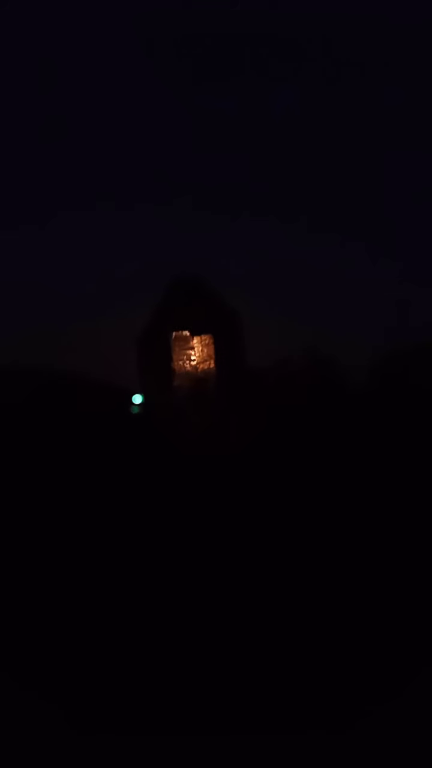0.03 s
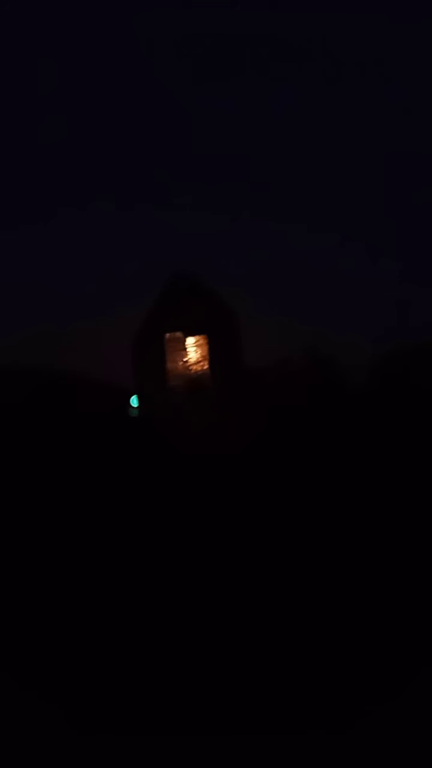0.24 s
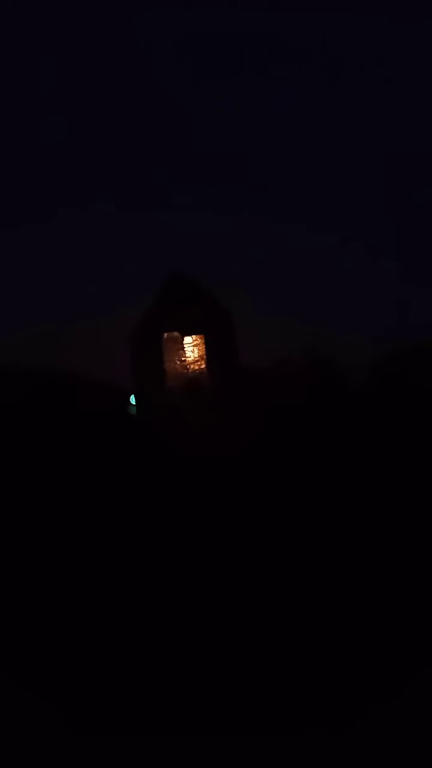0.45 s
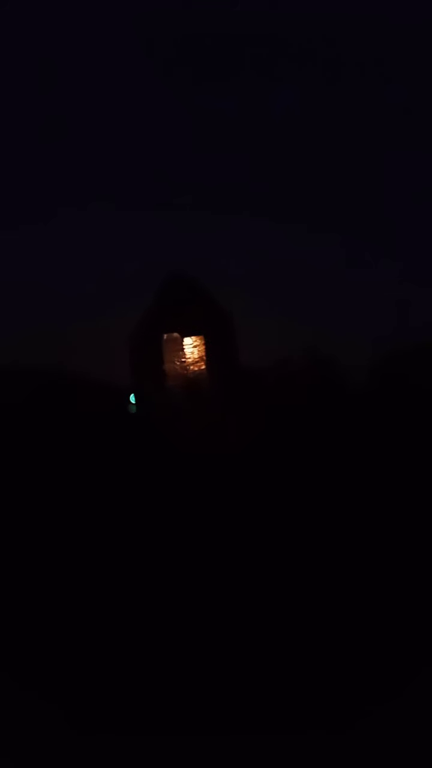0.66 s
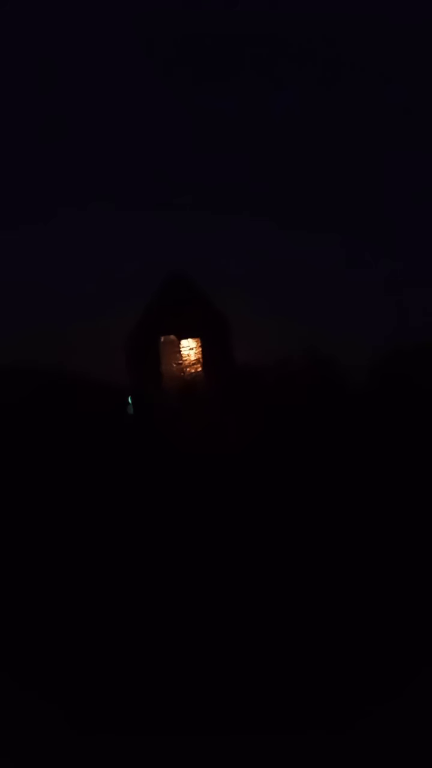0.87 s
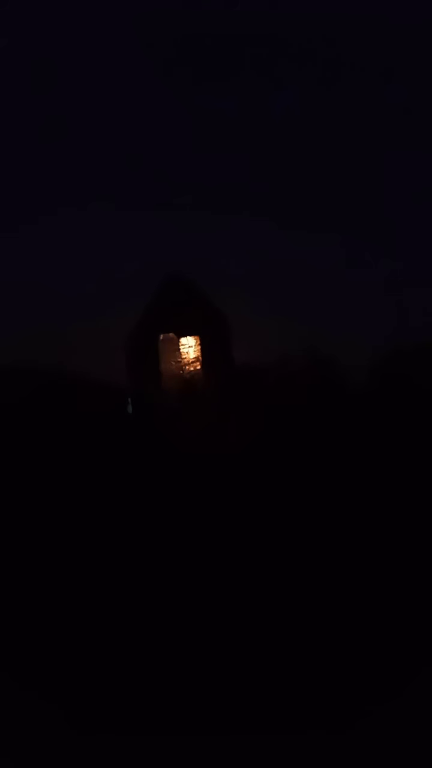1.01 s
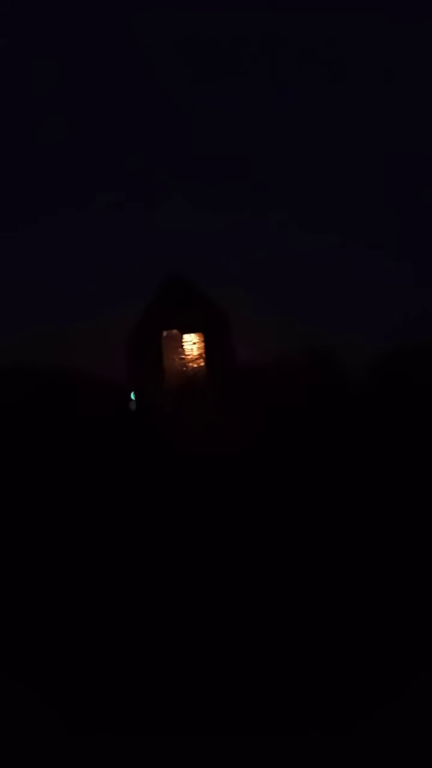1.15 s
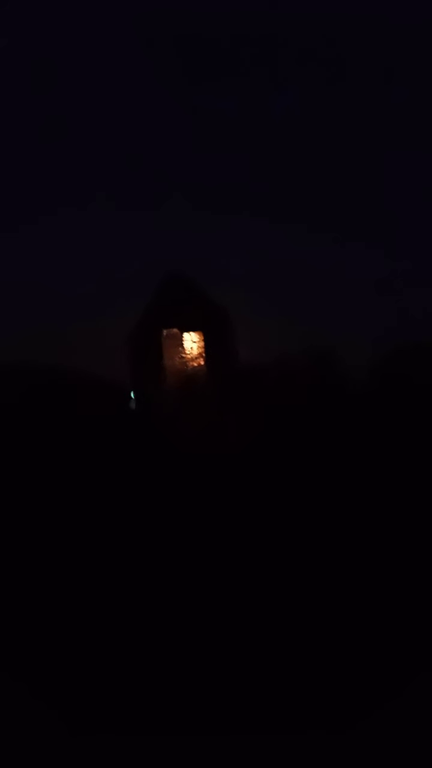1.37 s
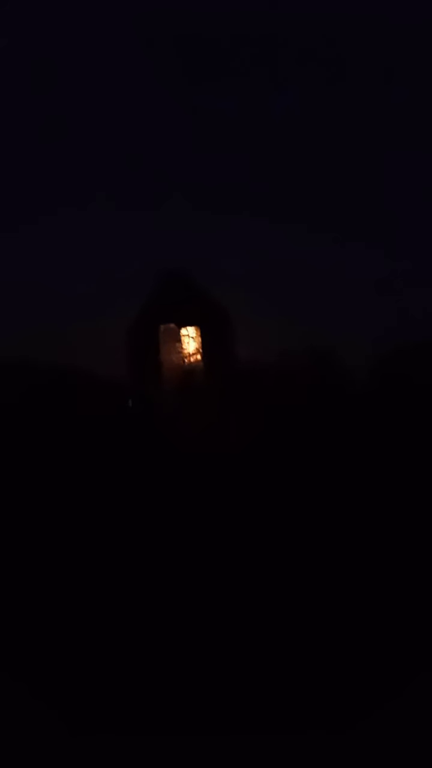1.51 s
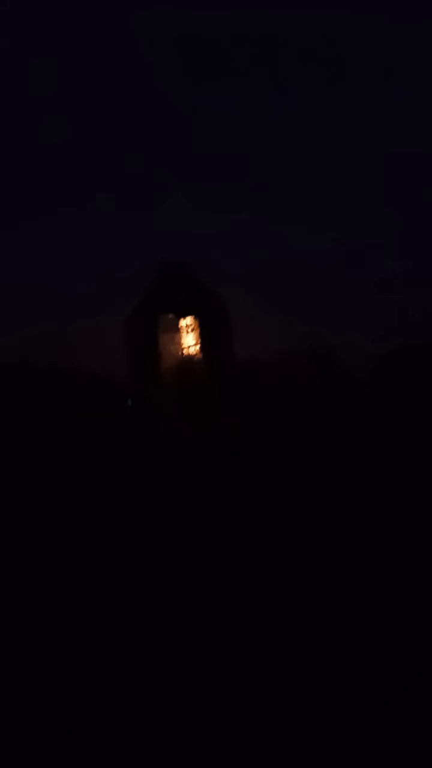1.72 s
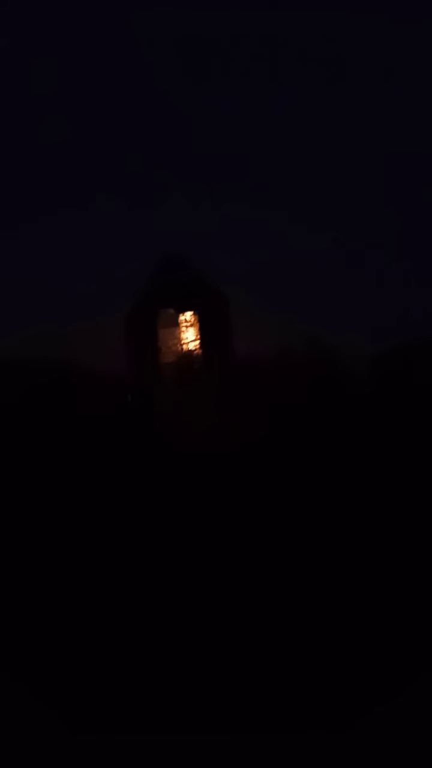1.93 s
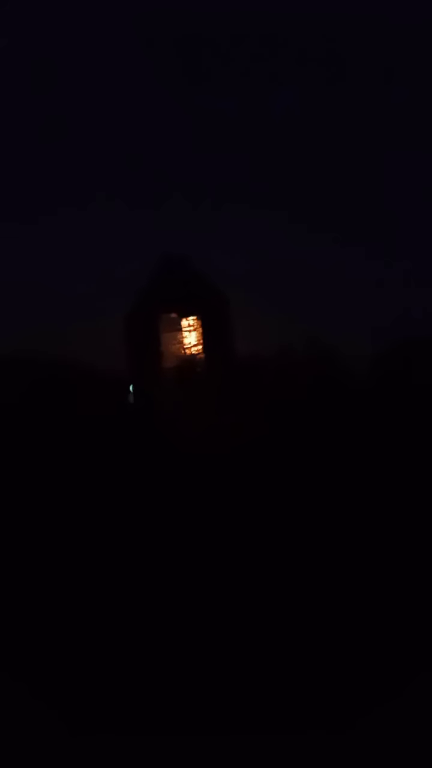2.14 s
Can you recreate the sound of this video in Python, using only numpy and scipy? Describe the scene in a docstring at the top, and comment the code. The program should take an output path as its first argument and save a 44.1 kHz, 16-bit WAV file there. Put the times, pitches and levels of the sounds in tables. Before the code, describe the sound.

Crickets sing without pause in a quiet night field. A loud, close insect buzz cuts off at the start; short even trills, faint distant rasps and thin ticks follow over still air and a barely audible low drone.

```python
"""A steady chorus of crickets and other insects, near and far, in a grassy field at night.
Each singer is a straying tone pulsed once per wing stroke; shaped noise stands for the countless far ones.
Very close to the microphone one insect ends its buzz at the start: gliding tones over grainy noise.
A nearer cricket trills in bouts of even strokes; three thin ticks are short bursts of bright noise.
Distant rasps of banded noise come and go over still air, a faint knock and a low drone of tones and rumble."""
import sys
import numpy as np
from scipy import signal
from scipy.fft import rfft, irfft, next_fast_len
from scipy.io import wavfile

SR = 44100
rng = np.random.default_rng(int(sys.argv[2]) if len(sys.argv) > 2 else 0)


def persist_wave(psi):
    """Save psi, clipped to +-1, as 16-bit WAV."""
    counts = np.round(np.clip(psi, -1, 1) * 32767).astype(np.int16)
    wavfile.write(sys.argv[1], SR, np.atleast_2d(counts).T)


N = 96314

# Groups that sing throughout:
# pitch_hz [Hz], spread_hz [Hz either side], level_db [dB], strokes_per_s [1/s], roughness [0-1]
CHOIRS = [(2600, 70, -51, 76, 0.01), (3235, 110, -52.5, 58, 0.11), (5464, 210, -42, 84, 0.07),
          (6988, 120, -39.5, 84, 0.1)]
# Gain of the highest group over time: time_s [s], gain_db [dB]
TOP_GAIN = [(0.09, 11), (.125, -15), (.165, 6), (.23, 0), (.78, 0.5), (1.1, 0.5), (1.47, 0.5), (1.62, 2),
            (1.97, -3.5), (2.055, 6.5), (2.18, -6)]
# Bouts of the nearer cricket:
# start_s [s], length_s [s], level_db [dB relative to TRILL_DB], strokes_per_s [1/s]
TRILLS = [(.187, .155, -4.5, 60), (.53, .19, -8, 62), (.82, .135, -6.5, 64), (1.03, .18, -9.5, 64),
          (1.43, .155, -4.5, 59), (1.847, .166, -.8, 63.5), (2.035, .125, -4, 68)]
# Strokes of the very close insect:
# start_s [s], length_s [s], level_db [dB], first_hz [Hz], last_hz [Hz]
CLOSE_STROKES = [(.004, .008, -20, 6700, 6700), (.012, .016, -24, 6900, 6950),
                 (.028, .015, -18, 7030, 6900), (.043, .015, -17.5, 6900, 6200),
                 (.070, .012, -18.5, 6880, 6450), (.082, .011, -19.5, 6660, 6560)]
# Spectrum of its wing scrape: freq_hz [Hz], density_db [relative dB per Hz]
SCRAPE_COLOUR = [(1500, -70), (3400, -28), (4100, -9.5), (4800, -9.5), (5500, 6.5), (6050, 4.5),
                 (6950, 5.5), (7700, -6), (9500, -17), (13800, -17)]
# Level of its wing scrape over time: time_s [s], level_db [dB]
SCRAPE_LEVEL = [(0, -15.5), (.01, -23), (.05, -24), (.066, -24.5), (.088, -35), (.102, -55)]
# Thin high ticks: start_s [s], level_db [dB]
TICKS = [(.964, -42), (1.022, -42), (1.081, -42)]
# Spectrum of a tick: freq_hz [Hz], density_db [relative dB per Hz]
TICK_COLOUR = [(5500, -33), (7200, 2), (8000, 1.5), (8600, -13), (9600, -12), (13500, -28)]
# Distant rasping calls, before their edges are widened:
# start_s [s], length_s [s], upper_db [dB], lower_db [dB]
RASPS = [(0.07, 0.11, -50, -55), (0.232, 0.088, -44.5, -52.5), (0.332, 0.085, -42.5, -55),
         (0.437, 0.092, -42.5, -55.5), (0.562, 0.083, -48, -56), (0.638, 0.097, -45.5, -58),
         (0.752, 0.13, -46.5, -55), (1.231, 0.22, -46, -57), (1.445, 0.23, -44.5, -57.5),
         (1.677, 0.26, -47, -57.5)]
# Spectra of the two rasp bands: freq_hz [Hz], density_db [relative dB per Hz]
RASP_UPPER = [(2000, -56), (3400, -45), (3850, -4.5), (4300, 3.5), (4800, 6.5), (5300, 1), (6000, -62),
              (8000, -43)]
RASP_LOWER = [(900, -61), (1450, -44), (1720, -19), (1870, -0.5), (2030, -5), (2200, -14), (2500, -41),
              (4000, -74)]
# Spectrum of countless far insects: freq_hz [Hz], density_db [relative dB per Hz]
WASH_COLOUR = [(1500, -42), (2250, -28.5), (2480, -8), (2900, -12), (3400, -11.5), (3650, -19.5),
               (3850, -16.5), (4900, -8.5), (5300, -1.5), (5900, -0.5), (6450, -7), (7000, -0.5),
               (7450, -5.5), (7900, -15.5), (8350, -26), (10700, -26), (11500, -34.5), (13800, -27)]
# Spectrum of the night air: freq_hz [Hz], density_db [relative dB per Hz]
AIR_COLOUR = [(20, -19), (70, -12), (200, -2), (280, -9.5), (350, -16.5), (560, -26), (900, -21.5),
              (1030, -11), (1150, -22), (1280, -12.5), (1500, -17), (2200, -1), (4000, -47)]
# Spectrum of the uneven low rumble: freq_hz [Hz], density_db [relative dB per Hz]
RUMBLE_COLOUR = [(20, -17), (40, -22), (70, -1), (150, -4.5), (800, -50)]
# Lasting tones of the low drone: pitch_hz [Hz], level_db [dB]
DRONE = [(164, -72.5), (244, -74)]
# Swells of the low drone: start_s [s], length_s [s], pitch_hz [Hz, centre], level_db [dB]
SWELLS = [(0.17, 0.048, 238, -59), (0.361, .22, 245, -65.5), (0.368, 0.22, 164, -60.5),
          (0.667, 0.052, 240, -61), (0.882, 0.21, 247.7, -62.5), (.99, 0.06, 161.2, -61),
          (1.085, 0.12, 243, -58.5), (1.302, .13, 239.7, -60), (1.352, .14, 166, -60.5),
          (1.545, 0.064, 82, -60.5), (1.706, 0.067, 246, -64.5), (1.744, 0.22, 164, -60.5),
          (1.79, 0.21, 82, -64.5), (1.976, .13, 247.7, -62.5)]
# Modes of the faint knock: pitch_hz [Hz], level_db [dB], t60_s [s]
KNOCK_MODES = [(470, -56.5, 0.11), (790, -62, 0.15)]

# Wings: rate of the roughness, share by which pitch strays (rms) and how fast
RASP_HZ, WANDER, WANDER_HZ = 245, .012, 71.4
# Chorus: singers per group, pulse exponent, share by which pitch sags in a stroke
SINGERS, STROKE_SHARP, SAG = 3, 0.86, 0.04
# Each singer's slow pitch drift and level swell (rms), and the rate of both
PITCH_DRIFT_HZ, WAVER_DB, WAVER_HZ = 35, 2.5, 6
TRILL_HZ, TRILL_DB = 5536, -33
TRILL_SAG, TRILL_ROUGH, TRILL_SHARP = 0.017, .05, 2.7  # share, 0-1, pulse exponent
CLOSE_ROUGH, CLOSE_WANDER, CLOSE_EDGE_S = .04, .005, .0025  # 0-1, share (rms), seconds
TICK_S, RASP_EDGE_S = .034, 0.037
WASH_DB, AIR_DB = -36.5, -61
DRONE_WIDTH_HZ, KNOCK_S = 7, .088
ECHO_DB, ECHO_T60_S = -4.5, 0.12
EDGE_HZ = 14000


def chorus():
    """All the groups of singers; the highest swells and falls back."""
    *lower, top = [choir(*row) for row in CHOIRS]
    top_gain = amp(np.interp(clock(), *np.transpose(TOP_GAIN)))
    return sum(lower) + top * top_gain


def choir(hz, spread, db, rate, rough, rate_spread=.14, unsteady=0.0836):
    """A few singers of one kind, each with its own pitch and unsteady wing pace."""
    out = np.zeros(N)
    for place in np.linspace(-1, 1, SINGERS):
        pace = rate * (1 + rate_spread * rng.uniform(-1, 1) + unsteady * drift(12.36))
        turns = np.cumsum(pace) / SR + rng.random()
        pitch = hz + spread * place + PITCH_DRIFT_HZ * drift(WAVER_HZ)
        swell = amp(WAVER_DB * drift(WAVER_HZ))
        out += unit(song(turns, pitch, SAG, rough, STROKE_SHARP, WANDER) * swell)
    return amp(db) * unit(out)


def song(turns, hz, sag, rough, sharp, wander):
    """One swelling pulse per wing stroke, its pitch sagging as the wing closes."""
    phase = turns % 1
    pulse = abs(np.sin(np.pi * phase)) ** sharp
    pitch = hz * (1 + sag * (.5 - phase))
    return unit(pulse * wing(pitch, rough, wander))


def wing(hz, rough, wander):
    """A wing rung by the teeth of its file: a straying tone, roughened by uneven strikes."""
    rough = np.clip(rough, 0, 1)
    ring = np.sqrt(1 - rough) + np.sqrt(rough) * flutter(RASP_HZ)
    pitch = hz * (1 + wander * drift(WANDER_HZ))
    tone = np.exp(2j * np.pi * np.cumsum(pitch) / SR)
    return unit((ring * tone).real)


def close_insect(grain_db=-2.0):
    """Gliding wing strokes right at the microphone, over a grainy scrape that soon dies away."""
    t = clock()
    strokes = np.zeros(N)
    for start, length, db, first, last in CLOSE_STROKES:
        glide = np.interp(t, [start, start + length], [first, last])
        tone = wing(glide, CLOSE_ROUGH, CLOSE_WANDER)
        strokes += amp(db) * gate(start, length, CLOSE_EDGE_S) * tone
    level = amp(np.interp(t, *np.transpose(SCRAPE_LEVEL)))
    level = level * (t < SCRAPE_LEVEL[-1][0])
    scrape = unit(noise(SCRAPE_COLOUR) * amp(grain_db * drift(RASP_HZ)))
    return strokes + level * scrape


def near_cricket(edge_s=0.0096):
    """A nearer cricket: short bouts of fast, even wing strokes."""
    out = np.zeros(N)
    for start, length, db, rate in TRILLS:
        turns = (clock() - start) * rate
        trill = song(turns, TRILL_HZ, TRILL_SAG, TRILL_ROUGH, TRILL_SHARP, WANDER)
        out += amp(db) * gate(start, length, edge_s) * trill
    return amp(TRILL_DB) * out


def ticks(edge_s=0.0075, grain_db=1.0):
    """Three brief, bright and uneven wing scrapes."""
    scrape = unit(noise(TICK_COLOUR) * amp(grain_db * drift(RASP_HZ)))
    level = sum(amp(db) * gate(start, TICK_S, edge_s) for start, db in TICKS)
    return scrape * level


def rasps(grain_db=1.5, throb_db=3.0):
    """Grainy calls in two bands, blurred by distance; the lower band throbs."""
    upper = unit(noise(RASP_UPPER) * amp(grain_db * drift(90)))
    lower = unit(noise(RASP_LOWER) * amp(throb_db * drift(27)))
    out = np.zeros(N)
    for start, length, upper_db, lower_db in RASPS:
        # widened to leave room for the soft edges
        envelope = gate(start - RASP_EDGE_S / 4, length + RASP_EDGE_S / 2, RASP_EDGE_S)
        out += envelope * (amp(upper_db) * upper + amp(lower_db) * lower)
    return out


def knock(rise_s=0.0037, tail_db=-8, tail_t60_s=0.32, blur_hz=35):
    """A soft, hollow knock: decaying modes that scatter into a broken tail."""
    t = np.maximum(clock() - KNOCK_S, 0)
    rings = np.zeros(N)
    for hz, db, t60 in KNOCK_MODES:
        ring = amp(-60 * t / t60) * np.sin(2 * np.pi * hz * t)
        tail = amp(tail_db - 60 * t / tail_t60_s) * hum(hz, blur_hz)
        rings += amp(db) * (ring + tail)
    return np.minimum(t / rise_s, 1) * rings


def far_insects_and_air(shimmer_db=1.0):
    """Shimmering noise of insects too far to tell apart, and steady noise of still air."""
    wash = unit(noise(WASH_COLOUR) * amp(shimmer_db * drift(200)))
    return amp(WASH_DB) * wash + amp(AIR_DB) * noise(AIR_COLOUR)


def drone(rumble_db=-71.5, gust_db=2.0):
    """Weak low tones over an uneven rumble; now one tone, now another swells out."""
    rumble = amp(rumble_db) * unit(noise(RUMBLE_COLOUR) * amp(gust_db * drift(8.8)))
    tones = sum(amp(db) * hum(hz, DRONE_WIDTH_HZ) for hz, db in DRONE)
    swells = np.zeros(N)
    for start, length, hz, db in SWELLS:
        pitch = hz + DRONE_WIDTH_HZ * drift(16)
        tone = unit(np.sin(2 * np.pi * np.cumsum(pitch) / SR))
        swells += amp(db) * gate(start, length, length / 2) * tone
    return rumble + tones + swells


def field(x):
    """Short, weak scatter from ground and bushes: decaying noise convolved with the sound."""
    t = clock()[:SR // 2]
    tail = rng.standard_normal(len(t)) * np.exp(-np.log(1000) * t / ECHO_T60_S)
    scatter = signal.fftconvolve(x, tail / np.linalg.norm(tail))[:N]
    return x + amp(ECHO_DB) * scatter


def hum(hz, width_hz):
    """A wavering tone: a carrier multiplied by slow complex noise."""
    return unit((flutter(width_hz) * np.exp(2j * np.pi * hz * clock())).real)


def noise(colour):
    """Noise with a spectrum given as (Hz, dB) points and an rms of one."""
    hz, db = np.transpose(colour)
    log_freq = np.log(np.fft.rfftfreq(N, 1 / SR) + 1)  # +1 avoids log of zero
    gain = amp(np.interp(log_freq, np.log(hz), db))
    return unit(irfft(rfft(rng.standard_normal(N)) * gain, N))


def flutter(width_hz):
    """Complex noise in a Gaussian band around zero; the width sets how fast it changes."""
    size = next_fast_len(N)
    z = rng.standard_normal(size) + 1j * rng.standard_normal(size)
    band = np.exp(-.5 * (np.fft.fftfreq(size, 1 / SR) / width_hz) ** 2)
    return unit(np.fft.ifft(z * band)[:N])


def drift(rate_hz):
    """Random wandering with an rms of one."""
    return unit(flutter(rate_hz).real)


def gate(start, length, edge):
    """Rises, holds and falls along quarter-sine edges; times in seconds."""
    t = clock() - start
    return np.sin(np.pi / 2 * np.clip(np.minimum(t, length - t) / edge, 0, 1))


def amp(db):
    """Decibels to gain."""
    return 10 ** (np.asarray(db) / 20)


def unit(x):
    """Scales to an rms of one."""
    return x / np.sqrt(np.mean(abs(x) ** 2) + 1e-20)


def clock():
    """Time of every sample in seconds."""
    return np.arange(N) / SR


def scene():
    """All the singers over the night air; only the chorus is given scatter."""
    singers = field(chorus()) + close_insect() + near_cricket() + ticks() + rasps()
    surroundings = knock() + far_insects_and_air() + drone()
    return (singers + surroundings)[None]


def record(dry):
    """The recorder's band limit: a linear-phase low-pass."""
    lowpass = signal.firwin(801, EDGE_HZ, window=("kaiser", 9), fs=SR)
    return signal.oaconvolve(dry, lowpass[None], "same")


dry = scene()
out = record(dry)
persist_wave(out)
```